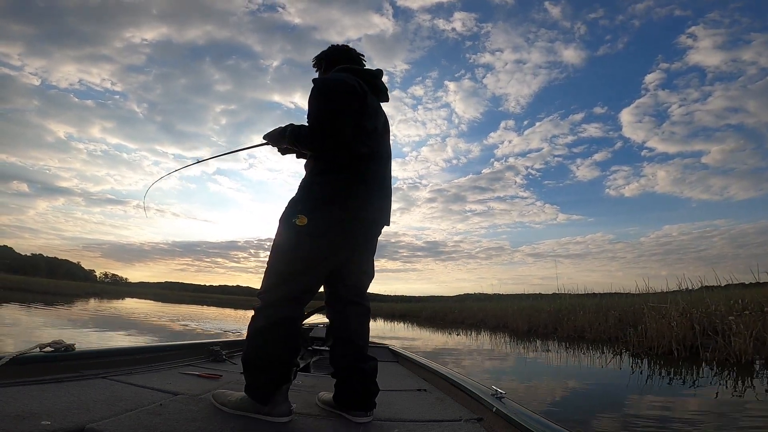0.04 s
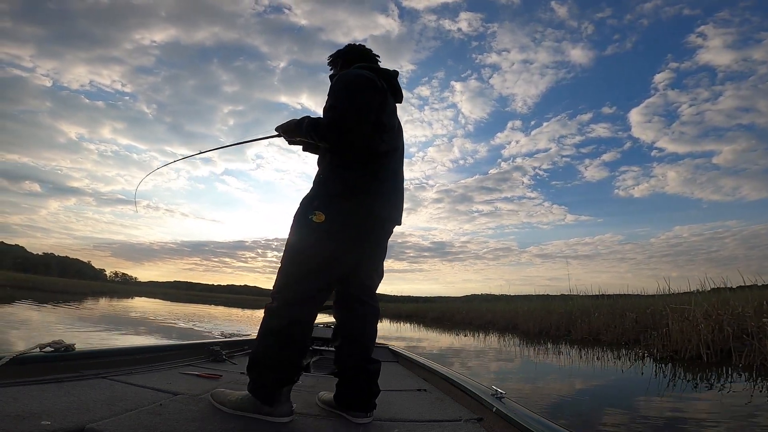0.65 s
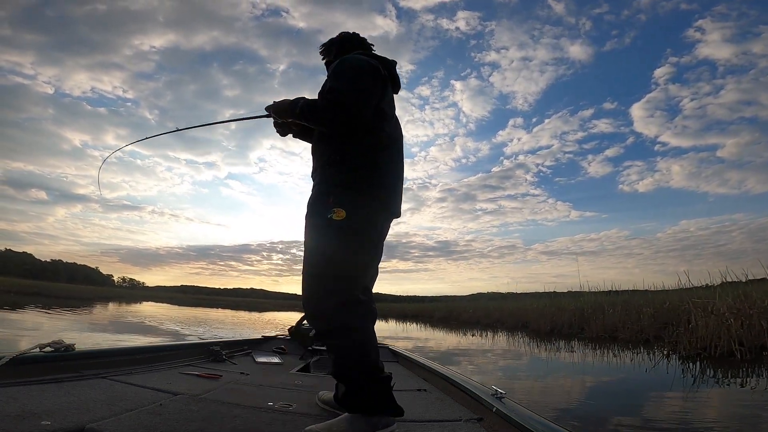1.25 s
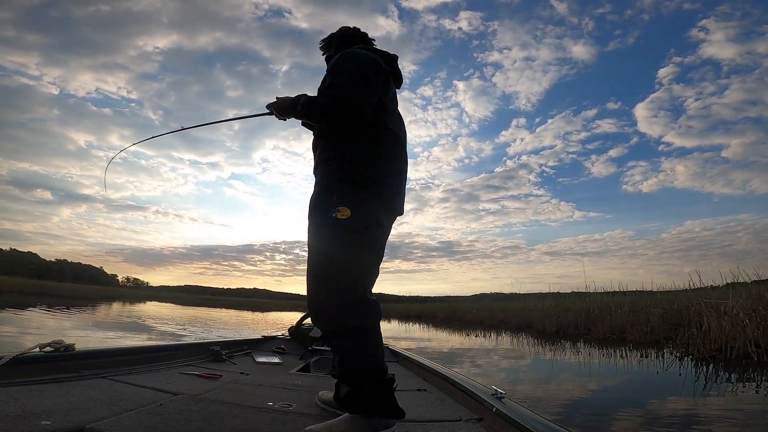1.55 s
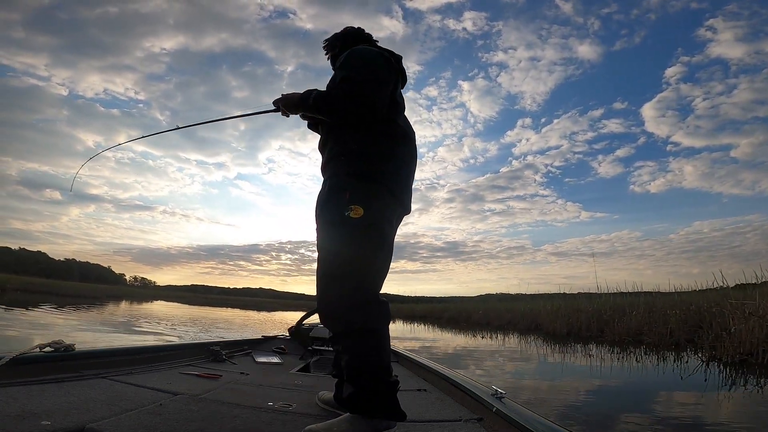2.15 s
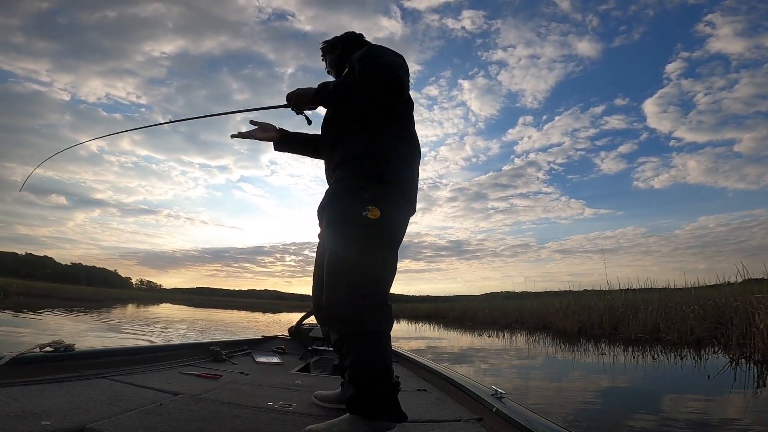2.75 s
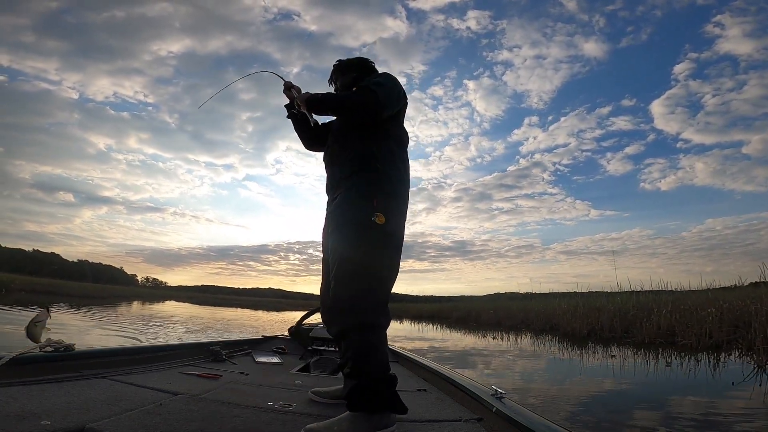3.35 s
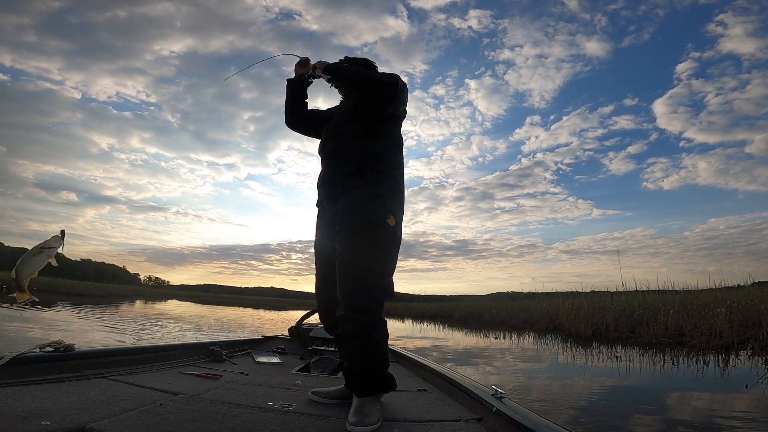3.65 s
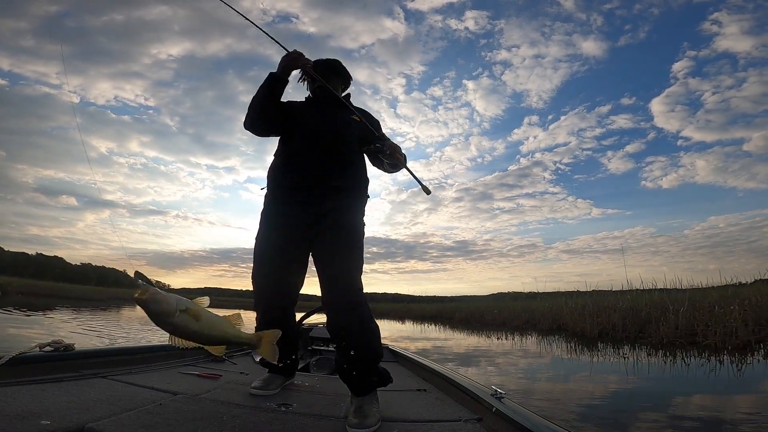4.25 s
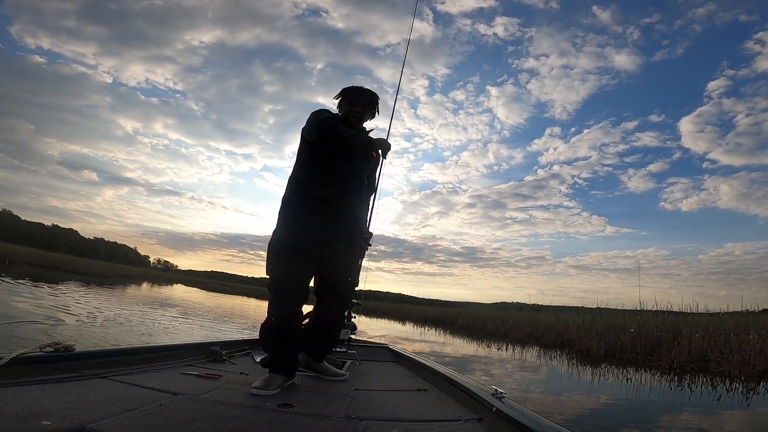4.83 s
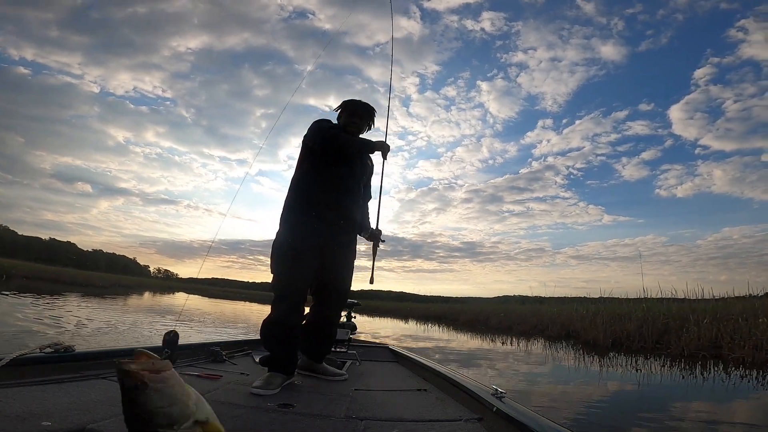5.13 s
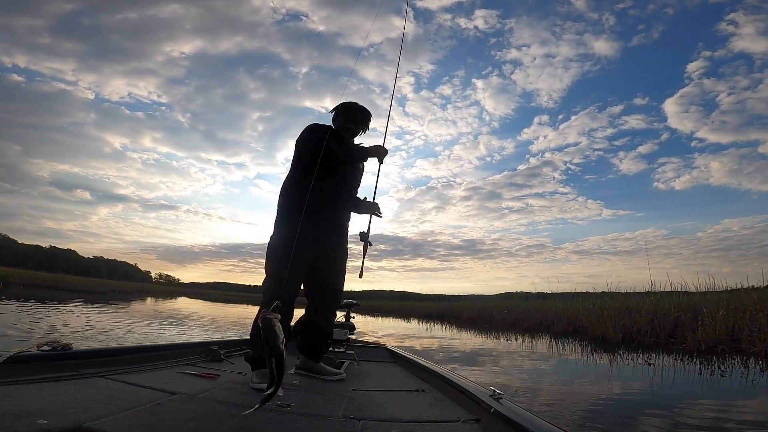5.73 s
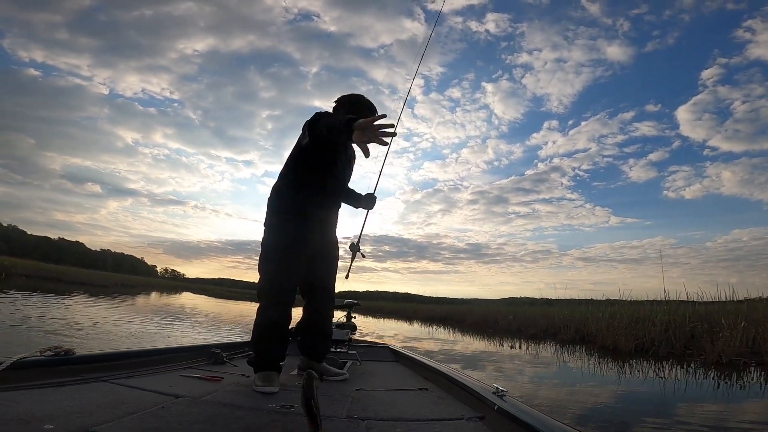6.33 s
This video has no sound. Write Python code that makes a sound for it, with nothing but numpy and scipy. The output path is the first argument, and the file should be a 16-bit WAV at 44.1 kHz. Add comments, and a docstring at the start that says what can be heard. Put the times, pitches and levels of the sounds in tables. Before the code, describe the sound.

A faint outdoor hush and low hull rumble lie under everything, heard close in stereo aboard a small boat. A sharp tackle knock comes at 0.2 seconds. Until about 4.5 seconds a waterproof suit rustles softly and water laps at the hull, with faint rasps of taut line up to 3.5 seconds. Bubbles plop, most strongly near 1.9 seconds. More knocks fall at 2.1, 2.8 and just after 4 seconds; boots bump and scuff near 1, 3.7 and 4.2 seconds. From 4.5 to 5 seconds comes the loudest part: a fish lands and thrashes on the hollow deck with heavy thumps, wet slaps and hissing spray. The hard lure in its mouth rattles with small bright clicks from then on. A knock follows at 5.4 seconds, then a knock and lighter flopping around 6 seconds, with small wet pops and a last scuff.

```python
"""Landing a fish in a small boat

On calm water, heard close by on a stereo microphone pair. An angler in a rustling waterproof suit plays
a fish beside the hull: the taut line rasps in the rod guides, tackle knocks and bubbles plop. The angler
steps back and swings it aboard. The wet fish slaps and thumps on the hollow deck, throwing spray,
and the hard lure in its mouth rattles."""
import sys
import numpy as np
from scipy import signal
from scipy.fft import rfft, irfft
from scipy.io import wavfile
from scipy.ndimage import map_coordinates

SR = 44100
rng = np.random.default_rng(int(sys.argv[2]) if len(sys.argv) > 2 else 0)


def output_pcm(signal):
    """Save a mono or channel-first signal as 16-bit PCM at the path in sys.argv[1].

    Samples are clipped to [-1, 1] before scaling.
    """
    pcm = np.clip(np.atleast_2d(signal).T, -1, 1) * 32767
    wavfile.write(sys.argv[1], SR, np.round(pcm).astype(np.int16))


N = 281703
TIME = np.arange(N) / SR
AGE = TIME[:SR // 2]   # seconds since the start of one event


def from_db(db):
    """Decibels to amplitude."""
    return 10 ** (np.asarray(db) / 20)


def unit_rms(x):
    """Scale to an RMS of 1."""
    return x / np.sqrt(np.mean(x ** 2) + 1e-20)


def gain_curve(rows):
    """Gain over time from rows of seconds and dB."""
    return from_db(np.interp(TIME, *np.transpose(rows)))


def at_hz(rows, hz):
    """Read a table on a log-frequency axis."""
    row_hz, values = np.transpose(rows)
    return np.interp(np.log(hz + 1), np.log(row_hz), values)


def shaped(x, gain_at, size=8192):
    """Minimum-phase filter with the given gain against frequency."""
    hz = np.arange(size // 2 + 1) * SR / size
    cepstrum = irfft(np.log(gain_at(hz) + 1e-6))
    fold = np.r_[1, np.full(size // 2 - 1, 2), 1, np.zeros(size // 2 - 1)]
    response = irfft(np.exp(rfft(cepstrum * fold)))
    return signal.oaconvolve(np.atleast_2d(x), response[None], axes=1)[:, :N]


def colour(x, spectrum):
    """Give white input a spectrum with steep skirts, keeping its power."""
    def gain_at(hz):
        skirts = np.minimum(1, hz / spectrum[0][0]) ** 2 / np.maximum(1, hz / spectrum[-1][0]) ** 4
        return unit_rms(from_db(at_hz(spectrum, hz)) * skirts)
    return shaped(x, gain_at)


def drift(per_s):
    """A random wander with an RMS of 1."""
    knots = rng.standard_normal(2048)
    return unit_rms(np.interp(TIME * per_s, np.arange(len(knots)), knots))


def grains(rough_db):
    """Two white noises whose shared strength jumps every millisecond."""
    sizes = np.repeat(rng.standard_normal(N // 44 + 1), 44)[:N]
    return unit_rms(rng.standard_normal((2, N)) * from_db(rough_db * sizes))


def random_sizes(step_db):
    """Two rows of gains: mostly small, a few up to three steps louder."""
    return from_db(step_db * np.minimum(rng.exponential(1, (2, N)), 3))


def ring(x, hz, t60):
    """One mode: a unit click sets a sine of height 1 ringing."""
    radius, angle = from_db(-60 / (t60 * SR)), 2 * np.pi * hz / SR
    return signal.lfilter([0, np.sin(angle)], [1, -2 * radius * np.cos(angle), radius ** 2], x + 1e-18)


def band(x, hz, q):
    """One resonance; white input keeps its power."""
    radius, angle = np.exp(-np.pi * hz / q / SR), 2 * np.pi * hz / SR
    gain = np.sqrt((1 - radius ** 2) / 2)
    return signal.lfilter([gain, 0, -gain], [1, -2 * radius * np.cos(angle), radius ** 2], x + 1e-18)


def swell(rise_s, t60):
    """Envelope that grows to 1, then falls 60 dB in t60 seconds."""
    return np.minimum(AGE / rise_s, 1) * from_db(-60 * np.maximum(AGE - rise_s, 0) / t60)


def add(out, start, sound):
    """Mix a sound in at a start time in seconds."""
    i = int(start * SR)
    out[..., i:i + sound.shape[-1]] += sound[..., :N - i]


def bursts(rows, rise_s):
    """Envelope of swells from rows of start, dB and t60."""
    envelope = np.zeros(N)
    for start, db, t60 in rows:
        add(envelope, start, from_db(db) * swell(rise_s, t60))
    return envelope


def calm_after_landing():
    """Gain that quiets suit and water once the fish is aboard."""
    return gain_curve([(4.45, 0), (5.1, -23)])


# Open air around the boat. Each row: frequency in Hz, relative level in dB.
AIR_COLOUR = [(88, -48), (150, 3.5), (291, -21), (871, -14), (1240, -10.5), (1980, -27.5), (4670, -27),
              (5460, -20), (8730, -36.5), (14200, -50)]
def morning_air(level_db=-63.5):
    """Still morning air lays a faint, steady hush under everything."""
    return from_db(level_db) * colour(rng.standard_normal((2, N)), AIR_COLOUR)


# The hull rocking underfoot. Each row: time in seconds, level in dB.
RUMBLE_LEVELS = [(0, -55.5), (1.3, -55.5), (1.55, -65), (2, -50.5), (2.5, -60.5), (2.9, -49.5), (3.2, -59),
                 (3.55, -49.5), (3.95, -50.5), (4.05, -51.5), (4.6, -44), (5.15, -44.5), (5.35, -49),
                 (5.62, -50.5), (6.39, -47)]
# Its spectrum. Each row: frequency in Hz, relative level in dB.
RUMBLE_COLOUR = [(12, -58), (20, -2.5), (60, 3.5), (130, -6), (200, -18.5), (300, -26), (520, -24),
                 (880, -93)]
def hull_rumble(sway_db=3.5):
    """The rocking hull rumbles unevenly."""
    rocking = from_db(sway_db * drift(per_s=6.9)) * gain_curve(RUMBLE_LEVELS)
    return rocking * colour(rng.standard_normal((2, N)), RUMBLE_COLOUR)


# The suit moving near the microphones. Each row: time in seconds, relative level in dB.
SUIT_MOTION = [(0, -70), (.13, -60), (.3, -68.5), (.45, -69), (.53, -61), (.62, -67.5), (.8, -51.5),
               (.88, -64), (1.06, -54.5), (1.28, -64), (1.41, -62), (1.56, -61), (1.64, -66.5), (1.71, -60),
               (2.02, -63.5), (2.26, -68), (2.55, -61), (2.64, -63), (2.83, -55.5), (3.02, -68),
               (3.14, -60), (3.36, -61), (3.6, -65.5), (3.76, -58.5), (4.03, -66), (4.26, -58.5),
               (4.44, -59)]
# The cloth's spectrum. Each row: frequency in Hz, relative level in dB.
SUIT_COLOUR = [(120, -17.5), (200, -1), (290, -10), (473, -6.5), (1060, 0.5), (1560, -1.5), (1840, -4.5),
               (2130, -7.5), (3070, -6.5), (8740, -16), (14300, -34), (16000, -36)]
def suit_rustle(gain_db=9, flutter_db=1.56):
    """Stiff cloth rubs on itself and swishes as the angler moves."""
    motion = gain_curve(SUIT_MOTION) * calm_after_landing()
    flutter = from_db(gain_db + flutter_db * drift(per_s=24))
    return colour(motion * flutter * grains(rough_db=1.5), SUIT_COLOUR)


def suit_crinkles(per_s=14, gain_db=28):
    """Now and then a fold of the stiff suit snaps over with a small tick."""
    snaps = (rng.random((2, N)) < per_s / 2 / SR) * random_sizes(step_db=3)
    snaps *= gain_curve(SUIT_MOTION) * calm_after_landing() * from_db(gain_db)
    return band(snaps[0], hz=2600, q=20) + band(snaps[1], hz=5060, q=7.5) / 2


# Pulls on the line, up at the rod. Each row: start and length in seconds, level in dB, pitch in Hz.
LINE_PULLS = [(0.118, 0.11, -56.5, 3440), (0.598, 0.19, -54, 2520), (1.329, 0.15, -52, 3380),
              (1.667, 0.09, -53, 3500), (1.776, 0.15, -52, 3150), (2.353, 0.064, -57, 3430),
              (2.472, 0.11, -52, 3520), (3.223, 0.28, -59.5, 3840)]
def line_rasp(q=2.8, rasp_db=3):
    """Taut line slipping over a rod guide gives a raspy hiss that swells with the pull."""
    out = np.zeros(N)
    for start, length, db, hz in LINE_PULLS:
        hiss = band(rng.standard_normal(len(AGE)), hz, q)
        hiss = unit_rms(band(hiss, hz, q))
        pull = np.sin(np.pi * np.minimum(AGE / length, 1))
        add(out, start, from_db(db) * pull * hiss)
    return out * unit_rms(from_db(rasp_db * drift(per_s=530)))


# Hard knocks on deck: tackle and shoes, a hollow clop of water against the hull near 2.8 s, # and the fish
# flopping at 5.4 s and 5.9 s. Each row: start in seconds, level in dB, # centre of the crack in Hz, ring of the
# lids in dB relative to that level.
KNOCKS = [(.225, -20.5, 2230, -3.5), (2.137, -28, 2760, -55), (2.816, -24.5, 1480, -14.5),
          (2.844, -31, 2200, -23), (4.09, -32, 1200, -26), (4.112, -29.5, 2300, -25),
          (4.279, -24.5, 2400, -17), (4.287, -21.5, 2540, -19.5), (5.389, -23.5, 1450, -9.5),
          (5.918, -22, 1890, -10.5)]
# Modes of the deck lids. Each row: frequency in Hz, relative level in dB, t60 in seconds.
LID_MODES = [(312, -8, 0.03), (448, -7.5, 0.038), (645, -7.5, 0.059), (791, -15, 0.046),
             (1000, -4.5, 0.039), (1234, -10, 0.064), (1484, -2, 0.023), (1990, 6, 0.005)]
def knocks(crack_db=-13, snap_db=6, dull_hz=4200):
    """A hard contact gives a sharp snap and a short crack, and rings the deck lids."""
    cracks, lid_hits = np.zeros((2, N))
    for start, db, hz, lid_db in KNOCKS:
        hit = from_db(crack_db) * swell(0.0001, t60=0.017) * rng.standard_normal(len(AGE))
        hit[0] += from_db(snap_db)
        add(cracks, start, from_db(db) * band(hit, hz, q=1.5))
        add(lid_hits, start, from_db([db + lid_db]))
    lids = sum((-1) ** k * from_db(db) * ring(lid_hits, hz, t60)
               for k, (hz, db, t60) in enumerate(LID_MODES))
    return signal.sosfilt(signal.butter(2, dull_hz, fs=SR, output="sos"), cracks) + lids


# Surges just over the side. Each row: time of the crest in seconds, relative level in dB.
SURGES = [(.42, -45.5), (.52, -45.5), (0.779, -42.5), (.87, -44.5), (1.08, -46.5), (1.48, -53.5),
          (1.78, -48), (1.896, -35.5), (2.829, -39.5), (3.03, -44), (3.21, -51.5), (3.5, -59), (3.7, -42.5),
          (4.15, -43), (4.33, -50.5)]
# The water's spectrum. Each row: frequency in Hz, relative level in dB.
WATER_COLOUR = [(150, -66), (250, -5), (557, 0), (798, -10.5), (1020, -6), (1680, -12.5), (2210, -19.5),
                (3600, -20), (4000, -85), (5200, -52), (8800, -120)]
def lapping(gain_db=-3, rise_db_per_s=213, fall_db_per_s=126, ripple_db=-92, bubbles_per_s=420):
    """Water stirred by the fish laps at the hull: small bubbles and a wash build fast and ebb slower."""
    surges = [db - np.maximum(rise_db_per_s * (crest - TIME), fall_db_per_s * (TIME - crest))
              for crest, db in SURGES]
    strength = from_db(gain_db + np.maximum(np.max(surges, axis=0), ripple_db))
    births = (rng.random((2, N)) < bubbles_per_s / SR) * rng.choice([-1, 1], (2, N))
    clicks = births * random_sizes(step_db=6.5)
    pitches_hz = np.geomspace(380, 2600, num=16)
    pitch_index = rng.integers(0, len(pitches_hz), N)
    bubbles = sum(np.sqrt(hz) * band(clicks * (pitch_index == k), hz, q=8)
                  for k, hz in enumerate(pitches_hz))
    wash = 0.94 * rng.standard_normal((2, N))
    water = unit_rms(colour(unit_rms(bubbles) + wash, WATER_COLOUR))
    return strength * calm_after_landing() * water


# Bubbles around the fish, beside the boat. Each row: start in seconds, level in dB, first pitch in Hz.
PLOPS = [(.405, -37, 550), (.469, -34, 640), (.866, -36, 515), (1.607, -31, 1307), (1.61, -30, 1055),
         (1.733, -30, 960), (1.786, -28, 1040), (1.852, -38, 1070), (1.971, -40, 1020), (1.798, -31.5, 450),
         (1.895, -22, 1030), (1.898, -24.5, 556), (1.931, -27, 1066), (2.099, -34.5, 1610),
         (2.239, -34, 1430), (2.418, -35.5, 1385), (2.572, -34, 1480), (2.696, -31, 1000),
         (2.814, -35, 910), (2.841, -47, 476), (3.022, -33, 1225), (3.216, -37, 510)]
def plops(glide_per_s=2.7, t60_cycles=40):
    """A bubble rings and rises in pitch amid the froth of its own splash; small ones die sooner."""
    out = np.zeros(N)
    for start, db, hz in PLOPS:
        tone = 0.5 * np.sin(2 * np.pi * hz * AGE * (1 + glide_per_s * AGE))
        froth = 0.18 * band(rng.standard_normal(len(AGE)), hz, q=8.8)
        add(out, start, from_db(db) * swell(0.00056, t60_cycles / hz) * (tone + froth))
    return out


# Scuffs down on the deck. Each row: start in seconds, level in dB, rise and t60 in seconds.
SCUFFS = [(1.031, -39, 0.019, 0.27), (3.459, -47, 0.041, 0.11), (3.677, -37.5, 0.0065, 0.072),
          (4.115, -62, 0.028, 0.24), (5.43, -52.5, 0.14, 0.088), (6.232, -36, 0.049, 0.068)]
# Their spectrum. Each row: frequency in Hz, relative level in dB.
SCUFF_COLOUR = [(120, -63), (200, 6), (288, -16), (554, -0.5), (1920, 4.5), (4260, -11), (4840, -13.5),
                (9000, -11.5), (11700, -60), (19800, -120)]
def carpet_scuffs():
    """Soles and fins drag over the deck carpet in short, gritty strokes."""
    strokes = np.zeros(N)
    for start, db, rise_s, t60 in SCUFFS:
        add(strokes, start, from_db(db) * swell(rise_s, t60))
    return colour(strokes * grains(rough_db=4.5), SCUFF_COLOUR)


# Soft blows on the deck: boots until 4.3 s, then the fish.
# Each row: start in seconds, level in dB, pitch of the struck panel in Hz.
THUMPS = [(1.041, -32.5, 77), (1.064, -38.5, 130), (1.112, -30.5, 45.2), (3.678, -25, 81),
          (3.717, -24.5, 75), (4.058, -36.5, 200), (4.09, -33.5, 242), (4.169, -20, 60.7),
          (4.288, -30, 216), (4.470, -15, 136.6), (4.478, -14.5, 201), (4.501, -16, 64.4),
          (4.524, -22, 231), (4.556, -27, 124), (4.667, -23, 94), (4.732, -18.5, 126.4), (4.798, -26.5, 79),
          (4.922, -32.5, 151), (4.969, -18.5, 148), (4.999, -22.5, 96), (5.401, -36.5, 219),
          (5.942, -26.5, 57.8), (5.967, -26, 89.6)]
# Modes of the hollow hull and deck. Each row: frequency in Hz, relative level in dB, t60 in seconds.
HULL_MODES = [(60, -12.5, 0.61), (65.7, -22, 1), (101.5, -9, 0.46), (163, 2, 0.13), (210, -14, 0.15),
              (271, -37, .1), (440, -30, .08)]
def deck_thumps(rise_cycles=0.4, t60_cycles=17, contact_s=0.0034, fittings_db=-19):
    """Each blow flexes a panel; its soft push rings the whole hull, and loose fittings shudder."""
    panels, pushes, shudder = np.zeros((3, N))
    push = AGE * np.exp(-2 * AGE / contact_s)
    for start, db, hz in THUMPS:
        flex = from_db(db) * swell(rise_cycles / hz, t60_cycles / hz)
        add(panels, start, flex * np.sin(2 * np.pi * hz * AGE))
        add(shudder, start, flex)
        add(pushes, start, from_db(db) * push / push.sum())
    hull = sum(from_db(db) * ring(pushes, hz, t60) for hz, db, t60 in HULL_MODES)
    fittings_colour = [(60, 6.5), (200, 8), (450, -4), (1000, -12)]   # Hz, dB
    fittings = colour(shudder * rng.standard_normal(N), fittings_colour)[0]
    return panels + hull + from_db(fittings_db) * fittings


# Spray and sliding skin as the fish thrashes on deck. Each row: time in seconds, relative level in dB.
THRASHING = [(4.46, -57), (4.53, -47), (4.75, -53), (4.8, -44), (4.89, -47.5), (4.95, -32.5), (5.11, -56),
             (5.58, -59.5), (5.7, -66.5), (5.92, -59.5), (5.99, -39), (6.14, -51), (6.39, -47)]
# The spray's spectrum. Each row: frequency in Hz, relative level in dB.
SPRAY_COLOUR = [(1470, 0.5), (2500, -8), (3690, -6), (3980, -7.5), (5480, -1), (6400, -7.5), (8870, -1),
                (10400, -15.5), (12100, -19), (13100, -15), (15200, -26)]
def spray(gain_db=-5.5, flicker_db=6.3):
    """Fine spray and sliding wet skin hiss unevenly from the moment the fish lands."""
    aboard = TIME > THRASHING[0][0]
    hiss = from_db(gain_db) * gain_curve(THRASHING) * aboard * grains(rough_db=2)
    return colour(hiss * from_db(flicker_db * drift(per_s=46)), SPRAY_COLOUR)


# Body and tail slapping the deck, close by. Each row: start in seconds, level in dB,
# pitch of the cupped air in Hz, its level in dB relative to the slap.
SLAPS = [(4.46, -34.5, 1290, 3.5), (4.468, -27.5, 450, 7.5), (4.474, -19.5, 1090, 0), (4.489, -22, 684, 3),
         (4.505, -19, 2600, -6), (4.523, -21.5, 2030, -2), (4.561, -24, 2960, 2.5), (4.642, -27, 2130, -12),
         (4.661, -25, 704, -2), (4.67, -23, 1200, 12.5), (4.794, -38.5, 800, 3.5), (4.92, -46.5, 4550, 23),
         (4.965, -22.5, 2890, 0.5), (4.985, -31, 3530, 3), (5.391, -46.5, 880, 9.5),
         (5.913, -40.5, 2600, 3), (5.961, -44.5, 1234, 12.5)]
# The spectrum of skin on deck. Each row: frequency in Hz, relative level in dB.
SLAP_COLOUR = [(150, -23), (250, 3), (381, -3.5), (660, -5.5), (840, -9), (978, -5.5), (1650, -4),
               (2390, -4), (5450, -18), (6130, -18), (14000, -116)]
def wet_slaps(rise_s=0.0025, t60_cycles=24, rings_below_hz=1600, ring_db=-3, hiss_db=-2, spatter_db=-13):
    """Wet skin hits with a crackle, smears along, squeezes out a pocket of air and throws spatter."""
    skin, pockets = np.zeros((2, N))
    crackle = grains(rough_db=3)
    smear = from_db(-17) * swell(rise_s, t60=0.16)
    contact = np.maximum(swell(rise_s, t60=0.022), smear)
    squeeze = 1.25 - 0.5 * np.exp(-AGE / 0.006)   # the pitch rises as the pocket flattens
    for start, db, hz, pocket_db in SLAPS:
        add(skin, start, from_db(db) * contact)
        pocket = from_db(hiss_db) * band(contact * rng.standard_normal(len(AGE)), hz, q=7)
        if hz < rings_below_hz:   # large pockets ring; small ones just hiss
            tone = np.sin(2 * np.pi * np.cumsum(hz * squeeze) / SR)
            pocket += from_db(ring_db) * swell(rise_s, t60_cycles / hz) * tone
        add(pockets, start, from_db(db + pocket_db) * pocket)
    spatter = from_db(spatter_db) * colour(skin * crackle[1], SPRAY_COLOUR)[0]
    return colour(skin * crackle[0], SLAP_COLOUR)[0] + pockets + spatter


# The flank landing on deck. Each row: start in seconds, level in dB, t60 in seconds.
SMACKS = [(4.466, -29, 0.046), (4.479, -28, 0.32), (4.662, -31.5, 0.24), (4.753, -45.5, 0.16)]
# Its spectrum. Each row: frequency in Hz, relative level in dB.
SMACK_COLOUR = [(200, -4.5), (320, 1), (470, -5), (620, -8.5), (850, -19)]
def flank_smacks():
    """The fish's full weight comes down with a dull, fleshy burst."""
    return colour(bursts(SMACKS, rise_s=0.0028) * rng.standard_normal(N), SMACK_COLOUR)[0]


# Modes of the hard lure. Each row: frequency in Hz, relative level in dB, t60 in seconds.
LURE_MODES = [(4300, -24, 0.0054), (5464, -1, .012), (5680, -1, 0.0078), (7100, 0, 0.0027),
              (8540, -1.5, 0.0052), (8970, -5, 0.0059), (11850, -7, 0.01), (14200, -9, .005)]
def lure_clink(vary_db=4.5, detune=0.03, pan_db=3, rebound_db=-7, max_rebound_s=0.004):
    """A bead or hook strikes the lure and rebounds; the modes vary in strength and pitch each time."""
    hz, db, t60 = np.transpose(LURE_MODES)[:, :, None]
    strength, tuning, side, polarity = rng.standard_normal((4, len(LURE_MODES), 1))
    age = AGE[:SR // 40]
    decay = from_db(db + vary_db * strength - 60 * age / t60)
    modes = np.sign(polarity) * decay * np.sin(2 * np.pi * hz * (1 + detune * tuning) * age)
    left_db = pan_db * side * hz / hz.max()   # higher modes stray further from the centre
    strike = np.array([np.sum(modes * from_db(mic_db), axis=0) for mic_db in (left_db, -left_db)])
    lag = int(max_rebound_s * rng.random() * SR)
    rebound = np.pad(strike, ((0, 0), (lag, 0)))[:, :len(age)]
    return strike + from_db(rebound_db) * rebound


# The clearest clicks from the fish's mouth. Each row: start in seconds, relative level in dB.
LURE_CLICKS = [(4.5734, -28.5), (4.6067, -27.5), (4.6201, -26), (4.7279, -30), (4.772, -29), (4.8007, -27),
               (4.81, -21), (4.88, -23), (4.921, -19.5), (4.9404, -23), (4.9496, -29), (4.9762, -22),
               (5.0037, -23), (5.019, -26.5), (5.0396, -30), (5.057, -30), (5.1522, -35), (5.1714, -39),
               (5.2248, -29.5), (5.2557, -31), (5.2806, -32.5), (5.3185, -33), (5.3555, -28.5),
               (5.474, -33), (5.4822, -32.5), (5.5794, -35), (5.6079, -35.5), (5.7196, -40.5),
               (5.8104, -32), (5.9765, -21.5), (5.99, -19.5), (6.002, -16), (6.0299, -29), (6.0504, -26),
               (6.0703, -24), (6.0978, -22.5), (6.2125, -52), (6.2714, -24), (6.3178, -25)]
def lure_rattle(gain_db=-8, loose_gap_s=0.014, loose_db=9, scatter_db=4, low_cut_hz=3800):
    """The fish shakes the lure; lesser contacts fall between the clicks, harder the more it thrashes."""
    slots = np.arange(LURE_CLICKS[0][0], TIME[-1] - loose_gap_s, loose_gap_s)
    lateness, size = rng.random((len(slots), 2)).T
    loose_starts = slots + lateness * loose_gap_s
    thrashing_db = np.interp(loose_starts, *np.transpose(THRASHING))
    loose_levels = thrashing_db + loose_db + scatter_db * (2 * size - 1)
    out = np.zeros((2, N))
    for start, db in [*LURE_CLICKS, *zip(loose_starts, loose_levels)]:
        add(out, start, from_db(db + gain_db) * lure_clink())
    return signal.sosfilt(signal.butter(4, low_cut_hz, "high", fs=SR, output="sos"), out)


# Wet pops from the fish's mouth and gills. Each row: start in seconds, level in dB, t60 in seconds.
POPS = [(5.145, -44.5, 0.022), (5.194, -34.5, 0.011), (6.066, -29, 0.015), (6.078, -39, 0.0089),
        (6.319, -41, 0.18)]
def gill_pops():
    """The fish's mouth and gills pop wetly; each small pocket of air rings briefly."""
    return band(bursts(POPS, rise_s=0.0021) * rng.standard_normal(N), hz=1290, q=9.8)


def boat_echo(x, echo_db, t60):
    """Gunwales and console add a brief dull echo, different at each microphone."""
    scatter = rng.standard_normal((2, len(AGE))) * swell(0.0025, t60)
    scatter /= np.sqrt(np.sum(scatter ** 2, axis=1, keepdims=True))
    echo = signal.oaconvolve(x[None], scatter, axes=1)[:, :N]
    tone = [(60, -16), (130, 4.5), (260, -0.5), (600, 10.5), (4000, 2), (12000, -43)]   # Hz, dB
    return x + from_db(echo_db) * shaped(echo, lambda hz: from_db(at_hz(tone, hz)))


# How alike the two microphones hear diffuse sound. Each row: frequency in Hz, likeness (1 up: near mono).
MIC_LIKENESS = [(60, 1.13), (300, 0.8), (700, 1.1), (1400, .5), (3100, 0.55), (7000, 1.5), (15000, 0)]
def spread(pair):
    """Two unrelated signals become mid and side, with a width that depends on frequency."""
    def side_gain(hz):
        alike = np.clip(at_hz(MIC_LIKENESS, hz), 0, 0.995)
        return np.sqrt((1 - alike) / (1 + alike))
    return pair[0] + shaped(pair[1], side_gain) * [[1], [-1]]


def scene():
    """From aboard: fish and deck sounds with their echoes, over water, spray, cloth and open air."""
    diffuse = lapping() + spray() + morning_air()
    fish = boat_echo(wet_slaps() + flank_smacks() + gill_pops(), echo_db=-13.5, t60=0.041)
    fish += lure_rattle()
    around_boat = deck_thumps() + knocks() + plops() + line_rasp() + suit_crinkles()
    around_boat = boat_echo(around_boat, echo_db=-13, t60=0.16)
    diffuse += suit_rustle() + carpet_scuffs() + hull_rumble()
    return fish + around_boat + spread(diffuse)


# Balance of the two microphone ports. Each row: frequency in Hz, left minus right in dB.
MIC_BALANCE = [(60, 1.4), (200, 0.5), (380, 1.5), (700, 5), (1300, 3), (2400, 2.5), (4400, 2.5), (8000, -1),
               (13000, -2)]
def record(dry, lag_samples=0.68, cutoff_hz=15800):
    """Each microphone port colours the sound its own way, the left a hair later; the top is cut."""
    left = shaped(dry[0], lambda hz: from_db(at_hz(MIC_BALANCE, hz) / 2))[0]
    right = shaped(dry[1], lambda hz: from_db(-at_hz(MIC_BALANCE, hz) / 2))[0]
    left = map_coordinates(left, [np.arange(N) - lag_samples], order=3)
    top_cut = signal.ellip(10, 0.1, 80, cutoff_hz, fs=SR, output="sos")
    return signal.sosfilt(top_cut, np.vstack([left, right]))


dry = scene()
out = record(dry)
output_pcm(out)
```